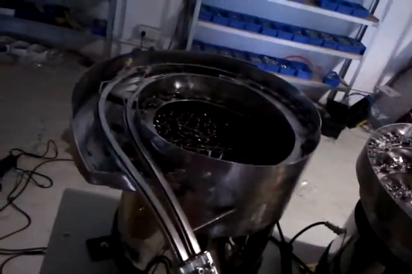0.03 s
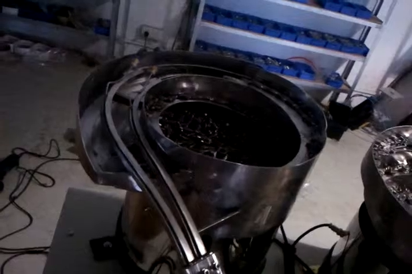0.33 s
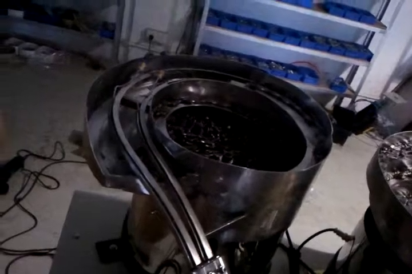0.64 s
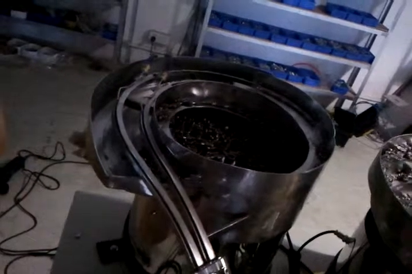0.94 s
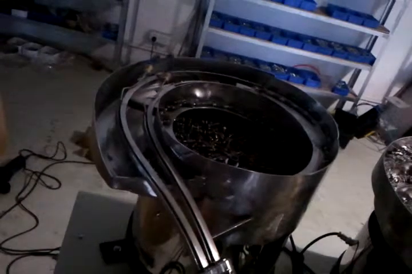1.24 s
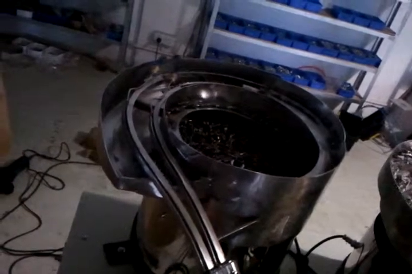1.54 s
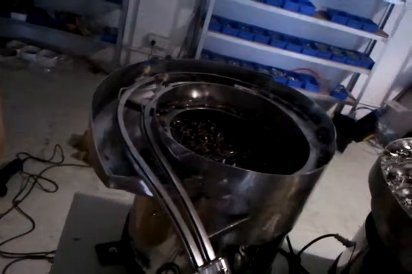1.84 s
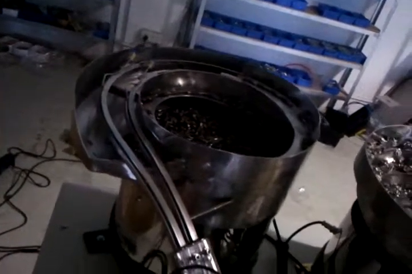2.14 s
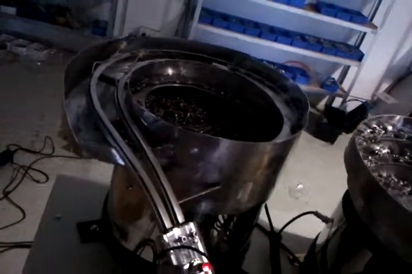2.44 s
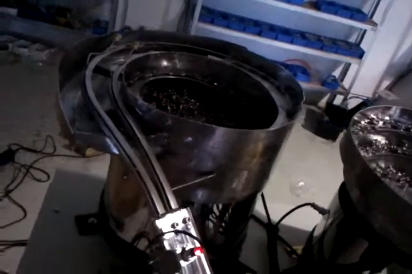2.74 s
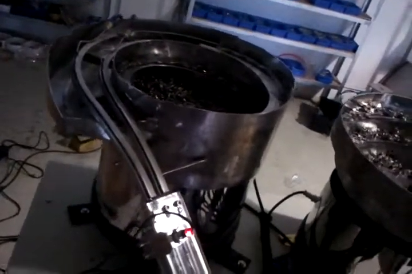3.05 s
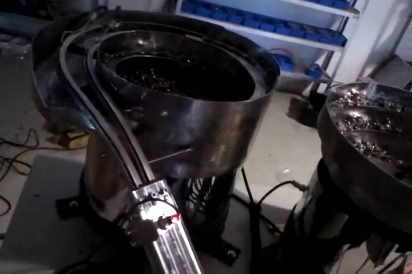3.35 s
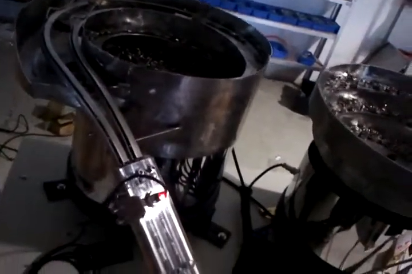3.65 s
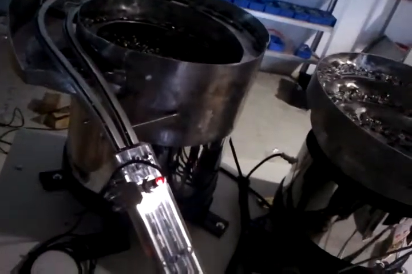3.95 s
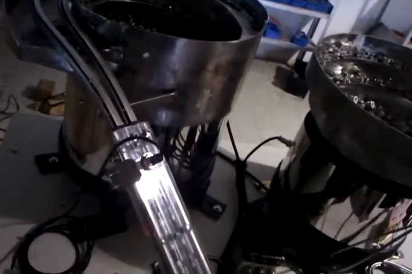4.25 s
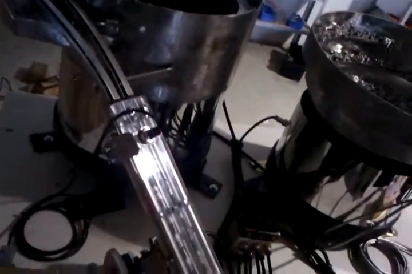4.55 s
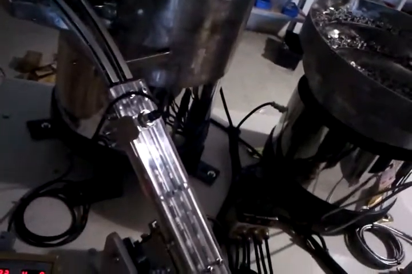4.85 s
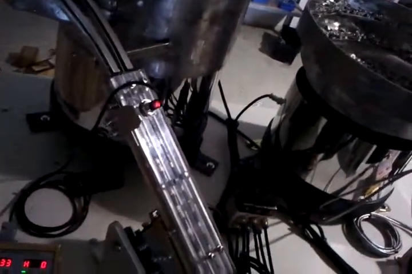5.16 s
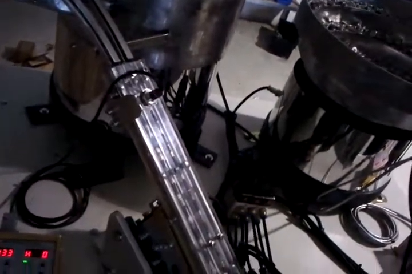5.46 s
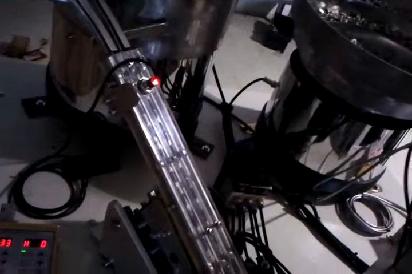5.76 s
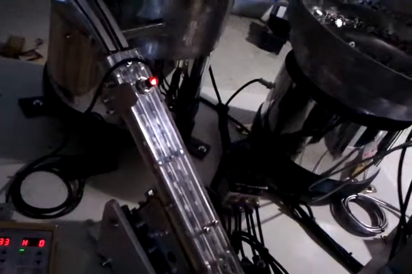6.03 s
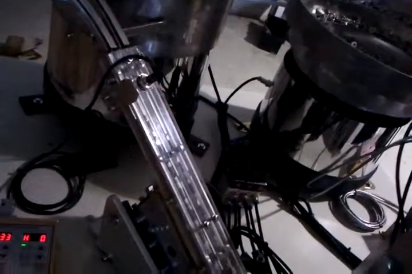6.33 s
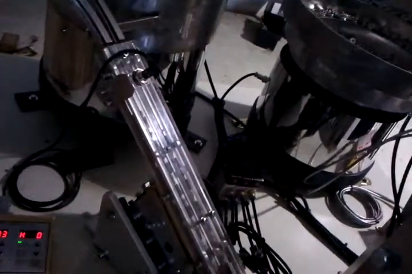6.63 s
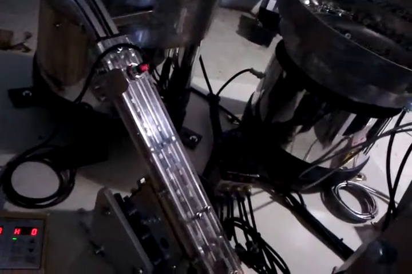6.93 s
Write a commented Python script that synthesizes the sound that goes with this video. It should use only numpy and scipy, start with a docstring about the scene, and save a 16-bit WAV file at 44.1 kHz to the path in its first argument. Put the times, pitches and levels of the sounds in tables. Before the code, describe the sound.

Steel screws rattle and clink in a vibrating bowl feeder while a machine rasps about once a second over hum and factory rumble.

```python
"""A vibrating bowl feeder shakes steel screws towards a packaging machine, close to an overloading microphone.
From the start screws rattle, clink, tumble and ring the bowl over drive hum and shop rumble. About once a
second the machine rasps and the rattle mostly slackens; parts clank, the frame thuds. Handling rubs and
surges come and go until 4.4 s. From 3 s the track rings louder and a panel drones at times.
Near 5 s sticking metal squeaks; the loudest drone follows at 6.1 s."""
import sys
import numpy as np
from scipy import signal
from scipy.fft import rfft, irfft, next_fast_len
from scipy.io import wavfile

SR = 44100
rng = np.random.default_rng(int(sys.argv[2]) if len(sys.argv) > 2 else 0)


def wav_out(sig):
    """Save sig, one row per channel (or a flat mono array), as 16-bit PCM at SR to the path in sys.argv[1]."""
    wavfile.write(sys.argv[1], SR, np.round(np.clip(np.atleast_2d(sig).T, -1, 1) * 32767).astype(np.int16))


N = 317079
TIME_S = np.arange(N) / SR
AGE_S = TIME_S[:SR]  # time since a hit

# shop rumble (frequency [Hz], density [dB])
RUMBLE_SPECTRUM = [(4, -11), (12, 2.5), (30, 1.5), (60, -0.5), (90, -5.5), (130, -8), (300, -22),
                   (700, -33.5), (2000, -66)]
# shop clatter (frequency [Hz], density [dB])
CLATTER_SPECTRUM = [(100, -7.5), (300, -4.5), (550, -4), (900, -1), (1600, -1.5), (2500, 2.5), (5000, -23)]
# shop clatter (time [s], level [dB])
CLATTER_LEVEL = [(0, -21), (.25, -13.5), (.7, -20.5), (1.7, -17.5), (2.5, -29), (2.9, -18), (4.0, -21.5),
                 (4.6, -18), (6, -19), (7.19, -15)]
# handling rubs (start [s], length [s], level [dB])
RUBS = [(-.05, .45, -15.5), (0.756, .4, -20), (1.157, .42, -17.5), (1.801, .23, -13), (3.87, .2, -19.5)]
# rubs (frequency [Hz], density [dB])
RUB_SPECTRUM = [(20, -4), (45, -0.5), (95, 0), (140, -3.5), (250, -10), (450, -24), (1000, -48.5)]
# handling surges (start [s], length [s], level [dB])
SURGES = [(-.05, .44, -10.5), (0.519, .08, -9.5), (0.93, .075, -8.5), (1.077, 0.1, -12),
          (1.292, .06, -11.5), (1.405, 0.047, -12), (1.73, 0.055, -14), (2.65, 0.39, -17),
          (3.381, 0.11, -15), (4.333, .085, -16)]
# surges (frequency [Hz], density [dB])
SURGE_SPECTRUM = [(4, -7), (13, 0), (25, -5), (50, -10), (100, -23), (400, -53)]
# drive hum (harmonic [-], level [dB])
HUM_HARMONICS = [(1, -37), (4, -31), (5, -31), (6, -37)]
# panel drones (start [s], length [s], level [dB], pitch [Hz], jitter [cycles])
DRONES = [(2.88, 0.21, -22, 202.6, 0.064), (4.368, 0.62, -25, 200.2, 0.087),
          (6.123, 0.27, -12.5, 119.6, 0.16), (6.303, 0.51, -20.5, 122, 0.15)]
# panel chatter (frequency [Hz], density [dB])
BUZZ_SPECTRUM = [(40, -7), (120, -2), (250, -3.5), (450, -10), (900, -30.5)]
# frame thuds (time [s], level [dB], pitch [Hz])
THUDS = [(0.075, -6, 108), (.186, -6, 150), (.266, -4.5, 170), (.29, -8.5, 130), (.331, -9, 120),
         (0.359, -8.5, 110), (.775, -3, 119), (1.005, -1, 132), (1.05, -3, 152.5), (1.36, -11, 100),
         (1.414, -4, 60), (1.545, -9.5, 110), (1.84, -9.5, 119), (2.316, -5.5, 99), (2.462, -8, 45.3),
         (3.223, -10.5, 154), (3.901, -11, 113), (3.955, -9, 115), (5.153, -12, 98.5), (5.222, -11.5, 170),
         (5.895, -13, 140), (6.859, -2.5, 76), (6.906, -11.5, 99), (6.972, -4, 109), (7.038, -6, 119)]
# frame shudder (frequency [Hz], density [dB])
SHUDDER_SPECTRUM = [(25, -21), (60, 0), (130, 0.5), (250, -4.5), (500, -30), (1200, -30.5)]
# light taps (time [s], level [dB], pitch [Hz])
TAPS = [(.578, -16, 840), (5.264, -10.5, 836), (5.266, -12, 1792), (6.738, -11.5, 850)]
# knocks on loose parts (time [s], level [dB], t60 [s])
CLANKS = [(.27, -16, 0.34), (0.565, -11, 0.62), (2.738, -9, 0.36), (2.831, -19, 0.47), (3.0, -7.5, 0.22),
          (3.235, -11.5, 0.6), (3.696, -20, 0.098), (4.747, -8, 0.32), (4.822, -15, 0.096),
          (4.94, -10, 0.24), (5.224, -12.5, 0.1), (5.263, -6.5, 0.22), (5.88, -8, 0.074),
          (6.746, -10, 0.28)]
# loose parts (frequency [Hz], width [Hz], level [dB])
PART_MODES = [(785, 62, -9.5), (878, 61, -3), (1160, 90, -5.5), (1250, 49, -4), (1556, 90, -3.5),
              (1783, 80, 0), (2550, 250, -0.5)]
# squeaks (start [s], length [s], level [dB], slack pitch [Hz], pressed pitch [Hz], width [Hz])
SQUEAKS = [(4.814, .024, -14, 2700, 2700, 160), (4.885, .135, -13.5, 3150, 3490, 130),
           (5.012, .075, -8.5, 3150, 3490, 220), (5.08, .09, -16, 3150, 3490, 220),
           (4.925, .165, -12, 2650, 2780, 380), (5.095, .035, -13, 2650, 2650, 300),
           (5.12, .05, -10.5, 2805, 2805, 180), (5.03, .11, -10, 3880, 4070, 300)]
# contact in the squeaking stroke (time [s], pressure [0-1])
PRESSURE = [(4.915, 0), (4.935, .45), (5.0, .42), (5.04, 1), (5.07, .95), (5.1, .42), (5.16, .3)]
# machine strokes (start [s], length [s], level [dB], scrape centre [Hz], rattle dip [dB])
STROKES = [(0.267, 0.398, -6, 2720, 4.5), (1.263, .44, -8.5, 2710, 0), (2.91, .39, -4, 2860, 3),
           (3.919, .47, -7, 2930, 0), (4.815, 0.018, -10, 3150, 0.5), (4.91, 0.302, -6, 2920, 4.5),
           (6.02, .33, -8.5, 2980, -0.5), (6.912, 0.39, -8.5, 2890, 0.5)]
# stroke grit (frequency [Hz], density [dB])
RASP_SPECTRUM = [(400, -22), (1000, -17.5), (2100, -.5), (2800, -1.5), (3400, 3), (3800, 3.5), (4200, 4),
                 (4800, -2.5), (5400, -5), (6500, -27.5)]
# track and stand (frequency [Hz], width [Hz], level [dB])
TRACK_MODES = [(450, 40, -3), (720, 40, -5), (850, 30, -3), (1120, 45, -3), (1262, 60, 0), (1405, 25, -5),
               (1534, 25, -1), (1610, 40, -4), (1720, 30, -3), (1795, 45, -2), (2060, 60, 1)]
# track as the microphone nears it (time [s], level [dB])
TRACK_LEVEL = [(0, -26.5), (2.6, -29.5), (3.6, -22.5), (5.6, -24), (7.19, -20.5)]
# tumbling screws (start [s], length [s], level [dB])
TUMBLES = [(0.637, 0.16, -6), (2.486, 0.13, -11.5), (3.277, 0.21, -9), (5.286, 0.093, -11)]
# tumbles (frequency [Hz], density [dB])
TUMBLE_SPECTRUM = [(2500, -16.5), (4000, -4), (5100, -1), (6000, -8), (7500, -22)]
# single screws (time [s], level [dB], pitch [Hz], t60 [s])
CLINKS = [(.24, -10.5, 2568, .48), (.305, -5, 2745, .31), (.42, -6.5, 2851, .34), (.44, -8, 2530, .25),
          (.57, -6.5, 4431, .15), (.67, -7.5, 4960, .3), (1.08, -8, 3275, .3), (1.29, -6, 4130, .5),
          (1.83, -7, 5365, .3), (2.12, -7, 4670, .33), (2.23, -6, 4020, .3), (2.41, -8, 3170, .35),
          (2.53, -4, 5120, .4), (2.57, -7, 5660, .39), (3.06, -6, 2760, .28), (3.06, -3.5, 4202, .25),
          (3.075, -3, 4655, .22), (3.135, -4.5, 2940, .27), (3.16, -4, 4270, .2), (3.21, -9, 2180, .3),
          (4.02, -8.5, 2760, .35), (4.08, -4, 3740, .4), (6.93, -2, 4365, .28), (6.96, -8, 2860, .3),
          (7.03, -6, 3950, .3)]
# screw heap (frequency [Hz], density [dB])
HEAP_SPECTRUM = [(250, -15.5), (600, -17), (1000, -11.5), (1950, -9.5), (2450, -2.5), (2950, -5.5),
                 (3250, -2.5), (3800, -2.5), (4100, -1), (4600, 0), (5100, -0.5), (5400, -3), (6300, -5),
                 (7500, -19)]
# heap drift (time [s], level [dB], lower-ring swell [dB])
HEAP_DRIFT = [(0, -0.5, 0), (1.0, -4.5, 0.5), (1.7, -4, 0), (3.3, -3.5, 0.5), (4.7, -6, -2),
              (5.5, -5, -0.5), (5.9, -5, -1), (7.19, -6.5, 1)]
# steel bowl (frequency [Hz], t60 [s], level [dB])
BOWL_MODES = [(963, .06, -9), (1222, .1, -9), (1405, .1, -8), (1534, .12, -8), (1582, .12, -8),
              (2060, .06, -6), (2170, .1, -4), (2207, .25, -1), (2756, .35, -5), (3299, .12, -5),
              (3499, .1, -3), (3730, .12, -5), (3950, .1, -4), (4086, .12, 0), (4160, .15, -3),
              (4285, .15, -5), (4440, .15, -5), (4602, .15, -4), (5119, .12, -4), (5361, .3, -5),
              (5620, .15, -8), (6600, .15, -10)]
# resonances the microphone passes (start [s], length [s], frequency [Hz], width [Hz], level [dB])
NEAR_MODES = [(-.4, 4.2, 961, 55, -21), (-.4, 4.3, 4128, 140, -11.5), (.6, 2.2, 2460, 200, -16.5),
              (1.61, 1.2, 4110, 94, -17), (3.9, 1.1, 2760, 25, -26), (3.5, 1.4, 3195, 60, -15.5),
              (5.346, 2.3, 4190, 560, -8), (5.4, .32, 4140, 64, -15), (5.6, 1.66, 2410, 160, -16.5),
              (6.2, 1.6, 3880, 40, -12), (1.05, .35, 2207, 14, -13.5), (5.72, .33, 2190, 13, -12),
              (6.495, .5, 2195, 18, -13)]
# microphone treble loss (frequency [Hz], gain [dB])
MIC_RESPONSE = [(5000, -1), (6000, -3), (6600, -5.5), (7100, -6.5), (7550, -11.5), (7800, -26),
                (8100, -35.5)]

DRIVE_HZ = 48.42


def amp(db):
    """Decibels to gain."""
    return 10 ** (np.asarray(db) / 20)


def unit(x):
    """Scale to rms 1."""
    return x / np.sqrt(np.mean(x ** 2) + 1e-20)


def curve(rows, column=1):
    """Table column, linear in time."""
    rows = np.asarray(rows)
    return np.interp(TIME_S, rows[:, 0], rows[:, column])


def colour(x, spectrum):
    """Filter by (frequency [Hz], gain [dB]) points."""
    hz, db = np.transpose(spectrum)
    size = next_fast_len(len(x) + 4096)
    bins_hz = np.fft.rfftfreq(size, 1 / SR)
    gain = amp(np.interp(np.log(bins_hz + 1), np.log(hz + 1), db))
    return irfft(rfft(x, size) * gain, size)[:len(x)]


def noise(spectrum):
    """Coloured noise, rms 1."""
    return unit(colour(rng.standard_normal(N), spectrum))


def wander(rate_hz):
    """Random drift, rms 1."""
    knots = rng.standard_normal(2000)
    return unit(np.interp(TIME_S * rate_hz, np.arange(len(knots)), knots))


def ring(x, hz, width_hz):
    """One decaying mode driven by x, rms 1."""
    pole = np.exp((-np.pi * width_hz + 2j * np.pi * hz) / SR)
    return unit(signal.lfilter([1], [1, -pole], x).imag)


def impacts(per_s, spread_db):
    """Random clicks of uneven strength."""
    at = np.flatnonzero(rng.random(N) < per_s / SR)
    out = np.zeros(N)
    out[at] = rng.choice([-1, 1], len(at)) * amp(spread_db * np.minimum(rng.exponential(1, len(at)), 4))
    return out


def spell(start_s, length_s, edge):
    """Soft rise, hold, soft fall; edge is each slope's share of the length."""
    progress = np.linspace(0, 1, 101)
    ramp = np.clip(np.minimum(progress, 1 - progress) / edge, 0, 1)
    return np.interp(TIME_S, start_s + length_s * progress, np.sin(np.pi / 2 * ramp))


def spells(rows, edge):
    """Envelope from (start [s], length [s], level [dB]) rows."""
    return sum(amp(db) * spell(start_s, length_s, edge) for start_s, length_s, db in rows)


def blow(rise_s, t60_s):
    """Quick rise, exponential fall."""
    return (1 - np.exp(-AGE_S / rise_s)) * np.exp(-np.log(1000) * AGE_S / t60_s)


def add(mix, time_s, sound):
    """Mix a short sound in at time_s."""
    part = mix[max(round(time_s * SR), 0):][:len(sound)]
    part += sound[:len(part)]


def shop(rumble_db=-17.5):
    """Lumpy rumble and blurred clatter of the surrounding machines."""
    rumble = noise(RUMBLE_SPECTRUM) * amp(rumble_db + 2.5 * wander(rate_hz=23))
    clatter = noise(CLATTER_SPECTRUM) * amp(curve(CLATTER_LEVEL) + 3.1 * wander(rate_hz=40))
    return rumble + clatter


def handling():
    """A hand rubs in small slips and pushes deep surges into the microphone."""
    slips = unit(colour(impacts(per_s=700, spread_db=4), RUB_SPECTRUM))
    return slips * spells(RUBS, edge=0.13) + noise(SURGE_SPECTRUM) * spells(SURGES, edge=0.12)


def drive_hum():
    """Harmonics of the slightly unsteady feeder drive."""
    cycles = DRIVE_HZ * TIME_S + 0.016 * wander(rate_hz=2.7)
    return sum(amp(db) * np.sqrt(2) * np.sin(2 * np.pi * (harmonic * cycles + rng.random()))
               for harmonic, db in HUM_HARMONICS)


def panel_drones():
    """Panels drone and chatter in spells."""
    buzz = amp(-6) * noise(BUZZ_SPECTRUM)
    out = np.zeros(N)
    for start_s, length_s, db, hz, jitter_cycles in DRONES:
        phase = 2 * np.pi * (hz * TIME_S + jitter_cycles * wander(rate_hz=45))
        out += amp(db) * spell(start_s, length_s, edge=0.18) * (np.sqrt(2) * np.sin(phase) + buzz)
    return out * amp(3 * wander(rate_hz=55))


def frame_thuds():
    """Each push briefly swings the frame, with a shudder."""
    swing, envelope = np.zeros((2, N))
    for time_s, db, hz in THUDS:
        push = amp(db + 5.5) * blow(rise_s=0.0023, t60_s=0.075)
        add(swing, time_s, push * np.sin(2 * np.pi * hz * AGE_S))
        add(envelope, time_s, push)
    shudder = unit(np.tanh(noise(SHUDDER_SPECTRUM)))
    return swing + amp(-2.5) * envelope * shudder


def taps():
    """A lightly touched part sounds one hollow mode."""
    out = np.zeros(N)
    for time_s, db, hz in TAPS:
        add(out, time_s, amp(db) * blow(rise_s=0.005, t60_s=0.17) * np.sin(2 * np.pi * hz * AGE_S))
    return out


def clanks():
    """Loose parts chatter after each knock."""
    chatter = rng.standard_normal(N)
    metal = unit(sum(amp(db) * ring(chatter, hz, width_hz) for hz, width_hz, db in PART_MODES))
    envelope = np.zeros(N)
    for time_s, db, t60_s in CLANKS:
        add(envelope, time_s, amp(db) * blow(rise_s=0.0022, t60_s=t60_s))
    return metal * envelope


def squeaks():
    """Sticking metal sings in hoarse, narrow bands; pitch follows pressure."""
    pressure = curve(PRESSURE)
    out = np.zeros(N)
    for start_s, length_s, db, slack_hz, pressed_hz, width_hz in SQUEAKS:
        phase = 2 * np.pi * np.cumsum(slack_hz + (pressed_hz - slack_hz) * pressure) / SR
        band = wander(1.5 * width_hz) * np.sin(phase) + wander(1.5 * width_hz) * np.cos(phase)
        out += amp(db) * spell(start_s, length_s, edge=0.15) * unit(band)
    return out


def machine_strokes(scrape_width_hz=700, scrape_db=-7):
    """Metal rubs on metal: uneven grit plus a hoarse scrape."""
    grit = unit(colour(impacts(per_s=3000, spread_db=5.5), RASP_SPECTRUM))
    slips = rng.standard_normal(N)
    out = np.zeros(N)
    for start_s, length_s, db, hz, _ in STROKES:
        scrape = ring(ring(slips, hz, scrape_width_hz), hz, scrape_width_hz)
        out += amp(db) * spell(start_s, length_s, edge=0.29) * (grit + amp(scrape_db) * scrape)
    return out * amp(1.2 * wander(rate_hz=35))


def track():
    """Shaking screws ring the track and its stand."""
    ticks = impacts(per_s=3000, spread_db=3)
    modes = sum(amp(db) * ring(ticks, hz, width_hz) for hz, width_hz, db in TRACK_MODES)
    return unit(modes) * amp(curve(TRACK_LEVEL))


def tumbles():
    """Screws slide off the heap and collide in a bright rush."""
    ticks = unit(colour(impacts(per_s=4000, spread_db=3), TUMBLE_SPECTRUM))
    return ticks * spells(TUMBLES, edge=0.18)


def clinks(mean_split_hz=31):
    """A screw strikes freely and jingles on two close modes."""
    out = np.zeros(N)
    for time_s, db, hz, t60_s in CLINKS:
        twin_hz = hz + mean_split_hz * (0.5 + rng.random())
        pair = np.sin(2 * np.pi * hz * AGE_S) + amp(-9.5) * np.sin(2 * np.pi * twin_hz * AGE_S)
        add(out, time_s, amp(db) * blow(rise_s=0.005, t60_s=t60_s) * pair)
    return out


def pings(count=3500):
    """Screws in the heap ring briefly, each at its own pitch."""
    age_s = AGE_S[:3000]
    out = np.zeros(N)
    for when, pitch, strength, sustain in rng.random((count, 4)):
        hz = 900 + 6300 * pitch
        t60_s = 0.13 * (0.5 + sustain)
        envelope = amp(6.7 * strength) * np.exp(-np.log(1000) * age_s / t60_s)
        add(out, when * N / SR, envelope * np.sin(2 * np.pi * hz * age_s))
    return unit(out)


def slackening_db(lead_s=0.12, lag_s=0.07):
    """Dip of the rattle around the strokes."""
    return sum(dip_db * spell(start_s - lead_s, length_s + lead_s + lag_s, edge=0.2)
               for start_s, length_s, _, _, dip_db in STROKES)


def screw_rattle():
    """Screws hop once per drive cycle: they tick, ping and ring the bowl."""
    hop = 1 + 0.15 * np.cos(2 * np.pi * DRIVE_HZ * TIME_S)
    ticks = unit(impacts(per_s=5000 * hop, spread_db=2))
    heap = unit(unit(colour(ticks, HEAP_SPECTRUM)) + amp(-6) * unit(colour(pings(), HEAP_SPECTRUM)))
    bowl, near = np.zeros((2, N))
    for hz, t60_s, db in BOWL_MODES:
        gain = amp(db + 0.8 * wander(rate_hz=7))
        strikes = ticks * rng.standard_normal(N)  # mode weight varies with the landing spot
        bowl += gain * ring(strikes, hz, width_hz=np.log(1000) / np.pi / t60_s)
    for start_s, length_s, hz, width_hz, db in NEAR_MODES:
        strikes = ticks * rng.standard_normal(N)
        near += amp(db) * spell(start_s, length_s, edge=0.19) * ring(strikes, hz, width_hz)
    rattle = heap + amp(-11.5) * unit(bowl)
    lower_ring = colour(rattle, [(1200, -31.5), (2050, 11.5), (3300, 1.0), (4300, -16.5)])
    swell = amp(curve(HEAP_DRIFT, column=2)) - 1  # the lower ring fades and returns
    return amp(curve(HEAP_DRIFT) - slackening_db()) * (rattle + near + swell * lower_ring)


def scene():
    """All sources, mono."""
    screws = screw_rattle() + track() + clinks() + tumbles()
    machine = machine_strokes() + squeaks() + clanks() + taps() + frame_thuds()
    background = handling() + drive_hum() + panel_drones() + shop()
    return (screws + machine + background)[None]


def record(dry):
    """Microphone: hard overload, treble loss, band limit."""
    gain_db, ceiling, cutoff_hz = 2.0, 0.53, 8145
    overloaded = np.clip(amp(gain_db) * dry[0], -ceiling, ceiling)
    lowpass = signal.firwin(1023, cutoff_hz, window=("kaiser", 9), fs=SR)
    return signal.oaconvolve(colour(overloaded, MIC_RESPONSE), lowpass, "same")[None]


dry = scene()
out = record(dry)
wav_out(out)
```